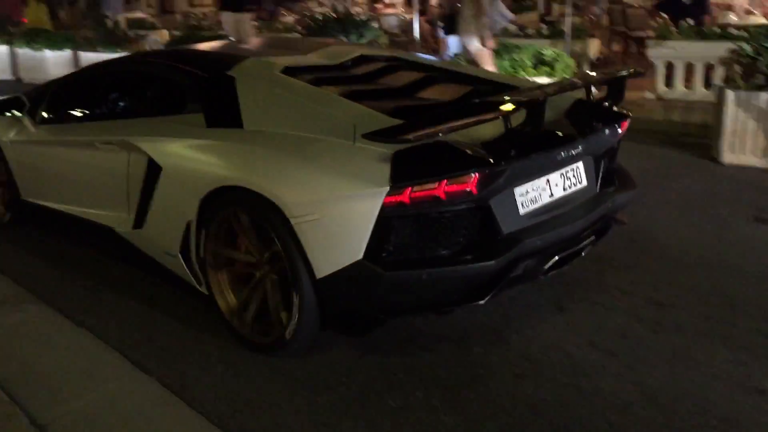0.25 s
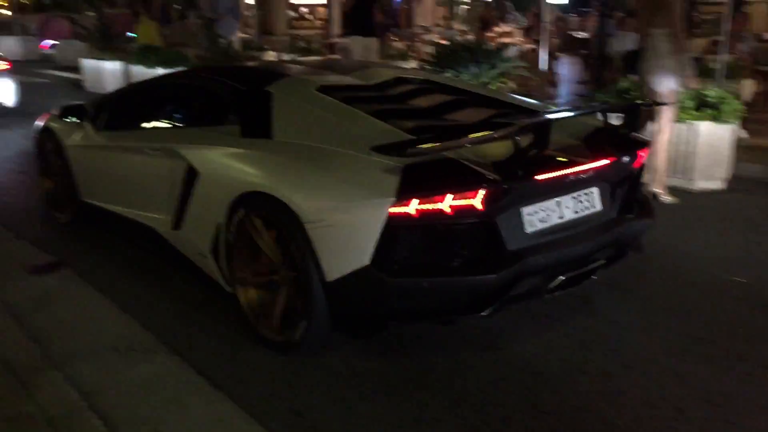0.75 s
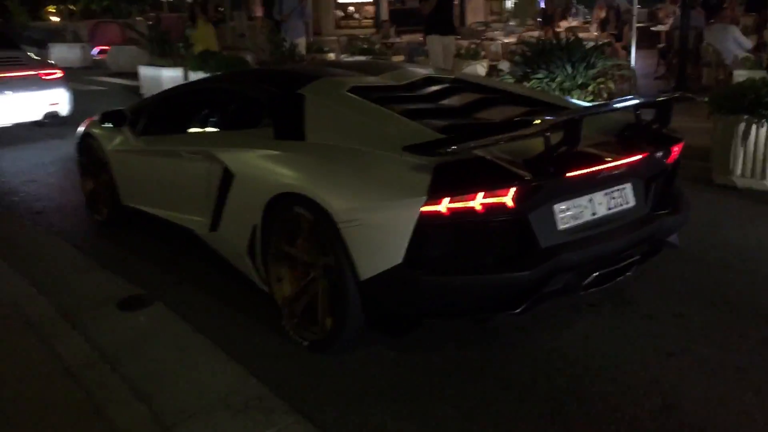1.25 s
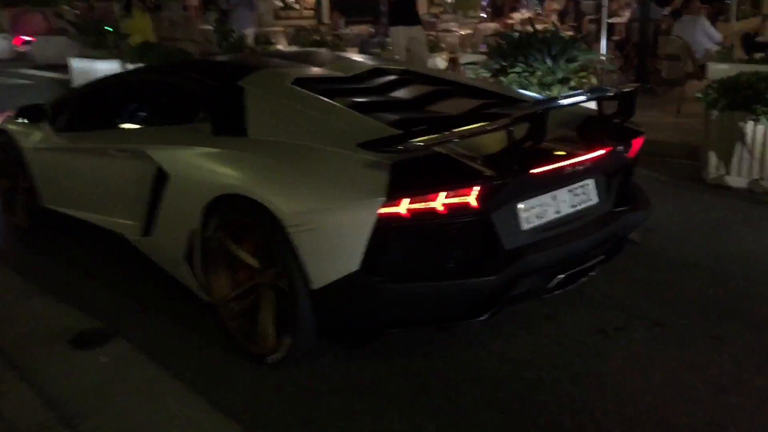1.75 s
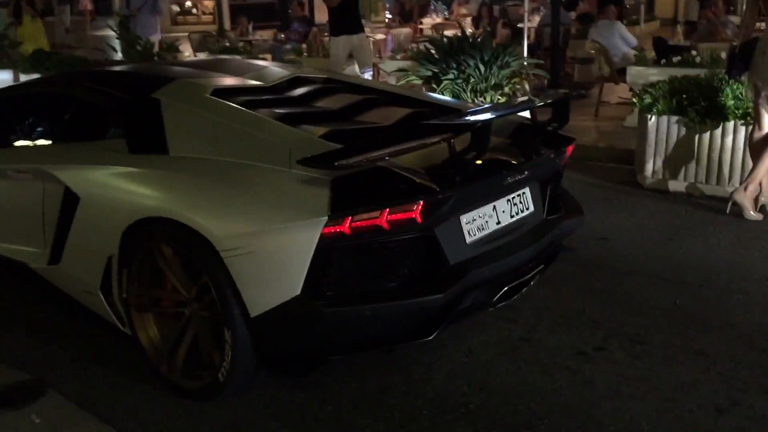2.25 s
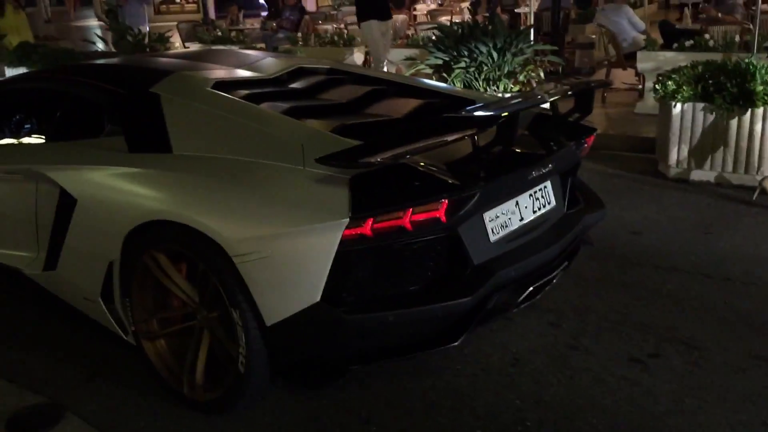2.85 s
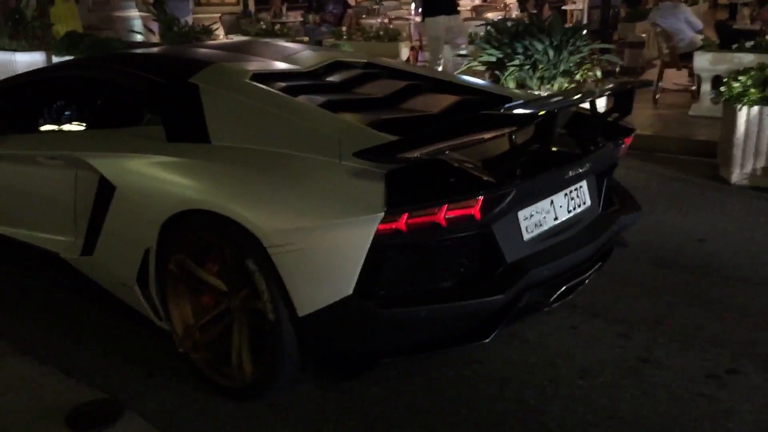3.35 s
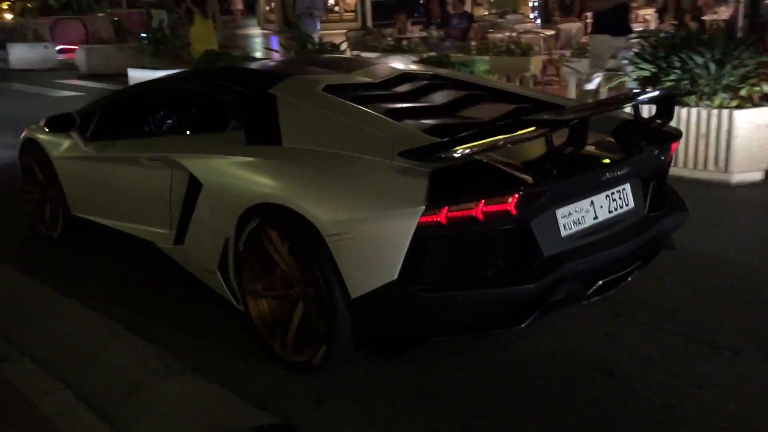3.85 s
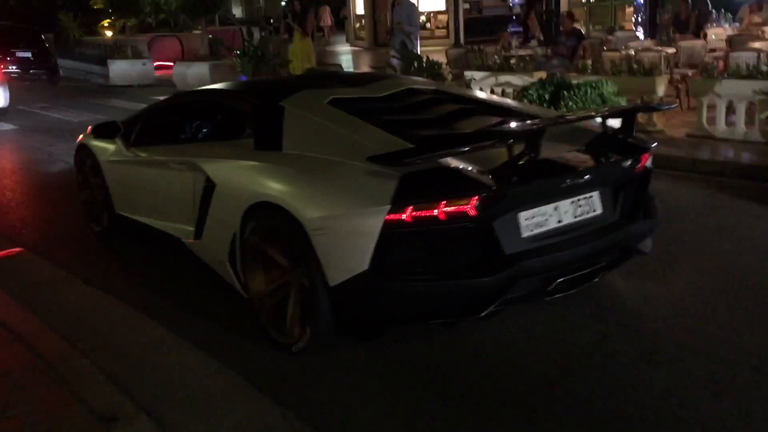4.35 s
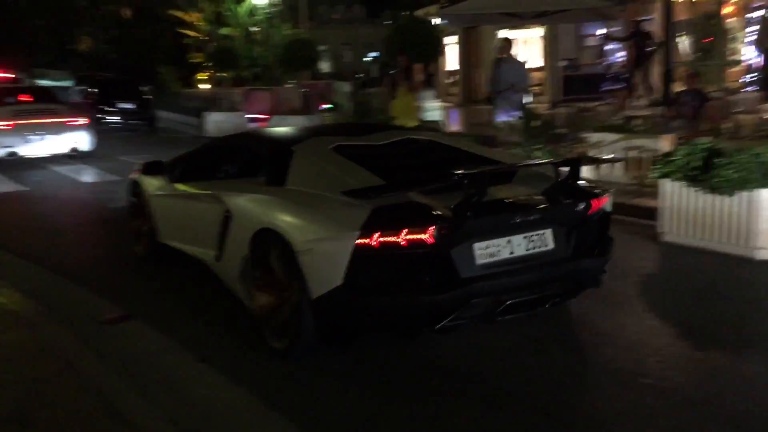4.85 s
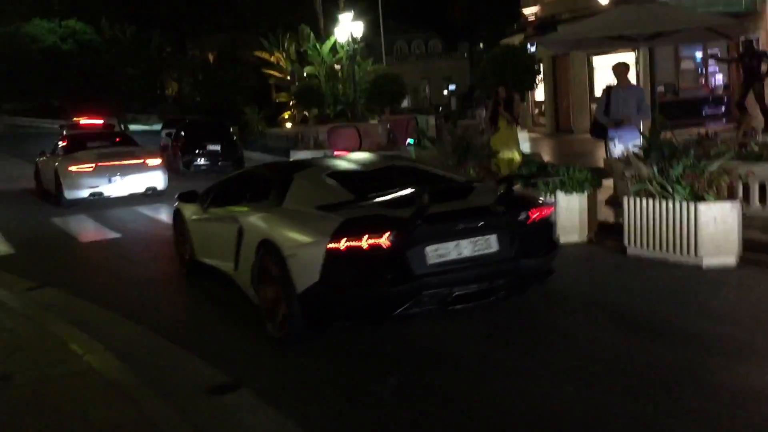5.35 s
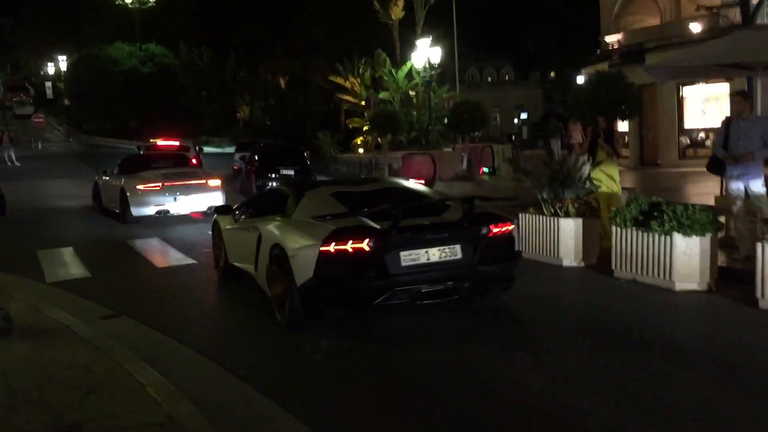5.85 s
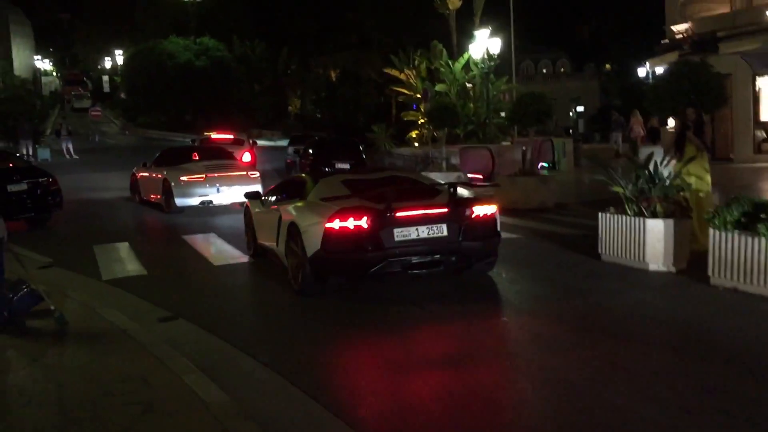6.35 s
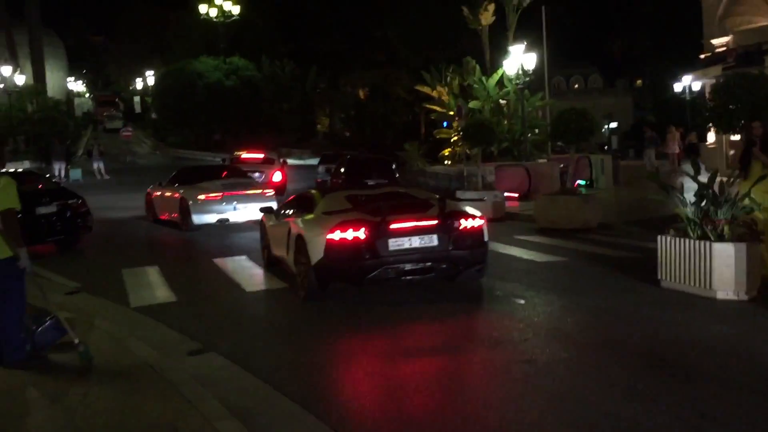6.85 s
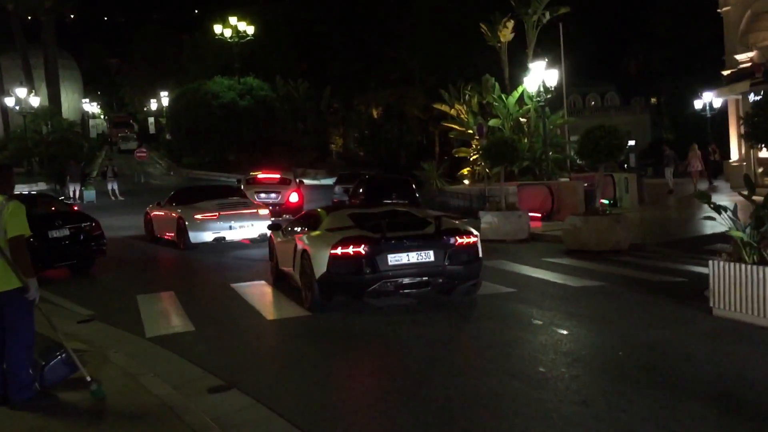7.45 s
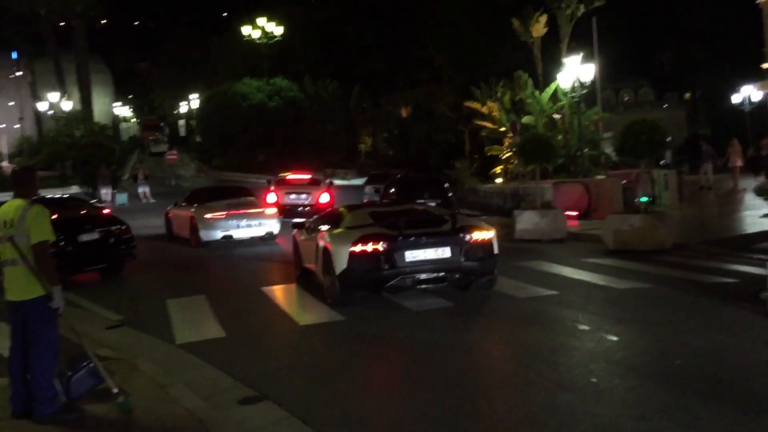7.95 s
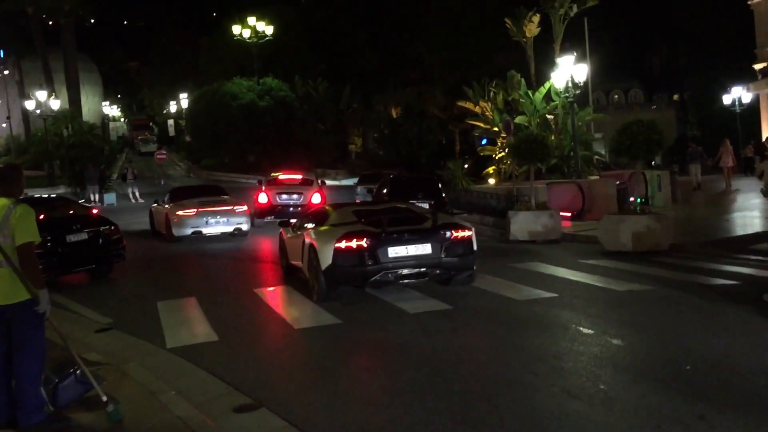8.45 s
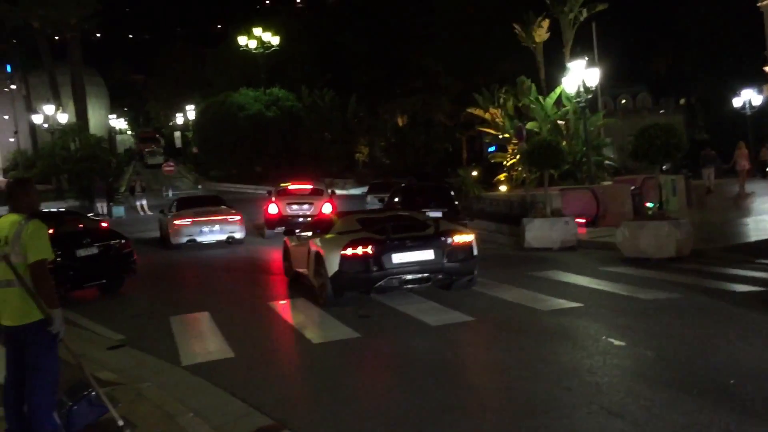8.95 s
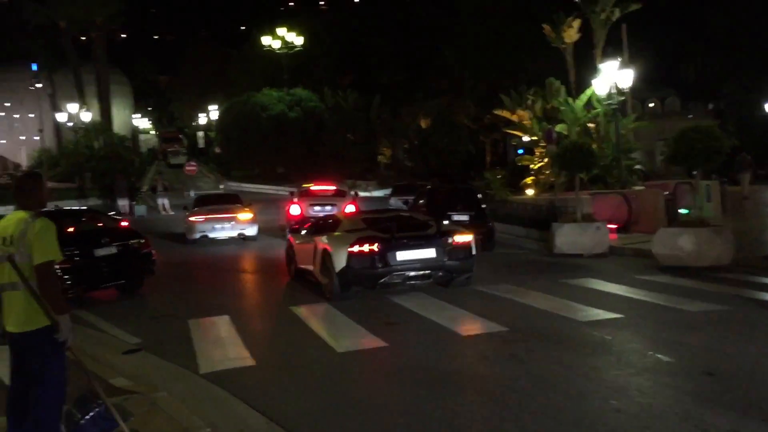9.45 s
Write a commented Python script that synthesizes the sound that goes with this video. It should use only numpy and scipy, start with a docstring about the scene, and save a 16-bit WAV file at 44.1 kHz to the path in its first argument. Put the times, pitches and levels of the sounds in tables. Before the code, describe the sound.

An open street at night, heard through a small handheld microphone behind a powerful twelve-cylinder sports car. From 0 s the engine drops quickly from a higher note to a lumpy idle, low and buzzing, with pulsed exhaust rasp and airy hiss. Thin, faint brake squeaks come around 0.6, 1.2, 1.7 and 2.1 s. At about 3 s a throttle blip snaps the pitch up with a raspy burst, leading into a strong, smoother booming drone that wavers until roughly 5.2 s. The car eases off; the pitch sags and soft, dull pops burble between 5.9 and 6.8 s. From 7 s it idles again, with light metallic ticking and another car's low hum, swelling near 6.5 and 8.3 s. At 8.6 s a second blip climbs higher, its hiss fading while the drone holds to the end at 9.7 s. Faint distant traffic lies beneath throughout.

```python
"""Twelve-cylinder engine creeping along a street

The engine idles, is blipped twice, holds a higher drone between the blips and burbles on the overrun.
Sine orders of the firing rate boom in the pipes, and noise gated by each firing rasps and hisses.
Unequal charges thump, misfires ring the pipe modes, and valve gear ticks once in four firings.
Brakes squeak as narrow-band noise, another car hums in sines, and far traffic is shaped noise."""
import sys
import numpy as np
from scipy import signal
from scipy.fft import rfft, irfft
from scipy.io import wavfile
from scipy.ndimage import uniform_filter1d

SR = 44100
rng = np.random.default_rng(int(sys.argv[2]) if len(sys.argv) > 2 else 0)


def bounce(signal):
    """Save signal as a 16-bit WAV file at the path given by the first command-line argument."""
    frames = np.transpose(np.atleast_2d(signal))
    limited = np.clip(frames, -1, 1)
    pcm = np.round(limited * 32767).astype(np.int16)
    wavfile.write(sys.argv[1], SR, pcm)


def undo_db(level):
    """Turn decibels back into plain size, where 20 dB means ten times bigger."""
    steps = np.asarray(level, float) / 20
    return 10 ** steps


N = 428211


def rms_one(x):
    """Normalization: a signal divided by its root mean square has unit power."""
    return x / np.sqrt(np.mean(x ** 2) + 1e-20)


def in_time(rows):
    """Linear interpolation turns the columns of a timed table into sample-rate curves."""
    s, *columns = np.transpose(rows)
    return [np.interp(np.arange(N) / SR, s, column) for column in columns]


def at_hz(points, hz):
    """Log-frequency interpolation: a spectrum table is read along a musical scale."""
    table_hz, table_db = np.array(points)[:, 0], np.array(points)[:, 1]
    return np.interp(np.log(hz), np.log(table_hz), table_db)


def drift(rate_hz):
    """Low-pass noise: a double pole leaves slow random motion of unit rms."""
    hop = 40  # samples per slow step
    r = np.exp(-2 * np.pi * rate_hz * hop / SR)
    white = rng.standard_normal(N // hop + 2002)
    slow = signal.lfilter([1], [1, -2 * r, r * r], white)[2000:]  # skip the onset of the filter
    return np.interp(np.arange(N) / hop, np.arange(len(slow)), rms_one(slow))


def coloured(x, spectrum):
    """Spectral shaping: each frequency is weighted by a table, then the rms is set to 1."""
    hz = np.arange(N // 2 + 1) * SR / N + 1  # plus 1 avoids log 0
    return rms_one(irfft(rfft(x) * undo_db(at_hz(spectrum, hz)), N))


def resonance(x, hz, width_hz, state=None):
    """Damped oscillator: a conjugate pole pair passes a band with gain 1 at its top."""
    r = np.exp(-np.pi * width_hz / SR)
    b = (1 - r * r) / 2 * np.array([1, 0, -1])
    a = [1, -2 * r * np.cos(2 * np.pi * hz / SR), r * r]
    return signal.lfilter(b, a, x, zi=state)


def gliding(x, hz, width_hz, size=256):
    """Time-varying resonance: the centre moves block by block while the stored state carries on."""
    out, state = np.zeros(N), np.zeros(2)
    for i in range(0, N, size):
        out[i:i + size], state = resonance(x[i:i + size], hz[i], width_hz, state)
    return out


def per_firing(turns, values):
    """Sample and hold: one value lasts for each firing."""
    return values[turns.astype(int)]


# Engine speed before inertia: time_s, firing_rate_hz
ENGINE_SPEED = [(0, 113), (.17, 83.3), (.24, 73.6), (.3, 73.2), (.48, 89.6), (.82, 82.5), (1, 86.8),
                (1.23, 87.2), (1.52, 89.8), (1.7, 90.2), (1.84, 92.6), (2, 89), (2.32, 89.7), (2.75, 87.6),
                (2.92, 90), (3.02, 98.5), (3.17, 141.5), (3.38, 157.8), (3.62, 163.8), (3.72, 162.5),
                (3.98, 147.6), (4.05, 147.6), (4.2, 156.3), (4.45, 153.3), (4.68, 159.4), (5.02, 165.6),
                (5.2, 162.8), (5.38, 146), (5.72, 147.3), (5.9, 135), (6.09, 142.8), (6.28, 126.8),
                (6.48, 127.5), (6.66, 107), (6.8, 103.3), (7.02, 80.8), (7.11, 80.5), (7.27, 90.6),
                (7.51, 89.4), (7.71, 92), (8, 90.7), (8.35, 91), (8.58, 101), (8.78, 143.5), (8.9, 159.3),
                (9.08, 168.8), (9.3, 184.5), (9.4, 182.5), (9.51, 175), (9.71, 172.1)]


def crank():
    """Rotational inertia rounds every change of speed; the integral of the rate counts the firings."""
    inertia_s = 0.05
    rate = uniform_filter1d(in_time(ENGINE_SPEED)[0], size=int(inertia_s * SR), mode="nearest")
    turns = np.cumsum(rate) / SR
    return turns, rate


# How hard the engine pulls, over the part-throttle level of the firing tone: time_s, level_db
ENGINE_LOAD = [(0, -2.5), (.15, -2), (.56, 0.5), (.89, -0.5), (1.8, 1.5), (2.8, 1), (3.07, 1), (3.2, 6.5),
               (3.4, 4), (3.45, 1), (3.85, 1), (4.02, -4.5), (4.21, 1.5), (4.46, 0.3), (5, 0.6),
               (5.22, -1.5), (5.44, -13), (5.67, -5), (5.92, -8), (6.08, -4.5), (6.25, -8.5), (6.55, -2.3),
               (6.7, -3.5), (6.94, 1), (7.12, -3), (7.5, 1), (8.45, -1.5), (8.7, -0.3), (8.88, 6.5), (9, 3),
               (9.2, 0.7), (9.39, -4), (9.6, -1.2), (9.71, -9.5)]
# The pipes favour each line at some speeds:
# firing_rate_hz, firing_tone_db, octave_db, seven_quarters_db, uneven_cylinders_db
LINE_LEVELS_BY_SPEED = [(71.4, -25, -16, -28, -32), (85, -25.5, -14.5, -32, -27.5),
                        (92.9, -22.5, -16, -28, -27.5), (105.4, -17.5, -23.5, -23.5, -32),
                        (121.2, -14.5, -34, -32, -27.5), (137.3, -14.5, -24, -33.5, -28.5),
                        (149, -13, -37, -34, -32.5), (161, -12, -40.5, -27.5, -32),
                        (185, -9.5, -42, -45, -41)]
# Separate swelling and fading of two tones: time_s, octave_db, seven_quarters_db
TONE_SWELL = [(0, -1, -2), (.12, 1.5, -4), (1.1, 0, 5.5), (3, -0.5, -3.5), (3.17, 6, -4), (3.32, -1, 0),
              (3.8, -4, 2), (4.02, 0.5, -4), (4.2, -5, 2.5), (4.7, -2.5, -4), (5, 5.5, -12.5),
              (5.3, 1.5, 0.5), (5.55, 1, -11), (5.92, 1.5, 3), (6.5, 0.5, 0.5), (6.85, -2, 7),
              (6.89, 4, -3.5), (7.8, 1, -7), (8.6, 1.5, -14), (8.8, 7, -8.5), (8.9, 8.5, -1),
              (9.12, 12.5, 2), (9.27, 0.5, -8), (9.71, 0.5, 1.5)]
# Unequal breathing of the cylinders, over the level set by the speed: time_s, level_db
UNEQUAL_BREATHING = [(0, -1.5), (.9, 0), (1.84, 2.5), (2.1, -0.5), (3.05, 0.5), (3.28, 8), (3.48, 0.5),
                     (4.5, -1.5), (4.95, 2), (5.24, -2.5), (5.45, -3), (5.65, 1), (6.2, 0), (6.6, -7),
                     (6.9, 0.5), (7.9, -4.5), (8.5, -1), (8.8, 2.5), (9, 1.5), (9.47, -3), (9.71, -1.5)]


def line_levels(rate):
    """Superposed gains in decibels: each line adds terms for speed, load or its own swell."""
    octave_follows, quarters_follow = 0.7, 1.47  # dB gained for each dB of load
    load_db, = in_time(ENGINE_LOAD)
    speeds, *laws = np.transpose(LINE_LEVELS_BY_SPEED)
    firing_db, octave_db, quarters_db, uneven_db = (np.interp(rate, speeds, law) for law in laws)
    octave_swell_db, quarters_swell_db = in_time(TONE_SWELL)
    firing_db = firing_db + load_db
    octave_db = octave_db + octave_follows * load_db + octave_swell_db
    quarters_db = quarters_db + quarters_follow * load_db + quarters_swell_db
    uneven_db = uneven_db + in_time(UNEQUAL_BREATHING)[0]
    return (firing_db, octave_db, quarters_db), uneven_db


# Orders of cylinders that breathe unequally over four firings: multiple_of_firing_rate, relative_level_db
UNEVEN_ORDERS = [(.25, -20.5), (.5, -3), (.75, 3), (1.25, 0.5), (1.5, 1.5), (2.25, 0), (2.5, -6),
                 (2.75, -6), (3, 3.5), (3.25, -9.5), (3.5, -19), (3.75, -9), (4, -7), (6, -1.5)]
# Boom of the pipes, which also colours the burble: frequency_hz, relative_level_db
PIPE_BOOM = [(15, -43.5), (32, -20.5), (45, -12), (90, -6.5), (130, -3), (180, 3), (230, -9), (278, -3.5),
             (320, -15.5), (360, -11), (410, -21.5), (480, -25.5), (570, -10.5), (640, -12.5), (720, -22),
             (1200, -48)]


def orders(turns, rate):
    """Fourier series of a periodic engine: three strong tones and weaker orders that the pipes colour."""
    tones_db, uneven_db = line_levels(rate)
    waver_db, loose_db, slip_rad = 1.03, 2.0, 0.2  # rms of the random motion
    out = np.zeros(N)
    for quarters, db in zip((4, 8, 7), tones_db):  # quarters of the firing rate
        gain = np.sqrt(2) * undo_db(db + waver_db * drift(6.2))
        out += gain * np.sin(np.pi / 2 * quarters * turns + quarters)
    for order, db in UNEVEN_ORDERS:
        boom_db = at_hz(PIPE_BOOM, order * rate)
        gain = undo_db(db + uneven_db + boom_db + loose_db * drift(3.3))
        phase = 2 * np.pi * rng.random() + slip_rad * drift(3.9)
        out += gain * np.sin(2 * np.pi * order * turns + phase)
    return out


# How unevenly the charges burn; the burble sounds 7 dB above this: time_s, relative_level_db
UNEVEN_BURNING = [(0, -30.5), (.24, -36), (.4, -42), (1.5, -35), (1.84, -36.5), (2.9, -39), (3.15, -25),
                  (3.32, -42.5), (5.65, -43.5), (6, -38), (6.22, -29), (6.35, -33), (6.47, -33.5),
                  (6.6, -35), (6.75, -27.5), (6.9, -36), (7.1, -42), (8, -35), (8.5, -41.5), (8.75, -27),
                  (9, -32), (9.5, -48), (9.71, -45)]


def burble(turns, rate):
    """Random impulse train: chance differences between firings thump dully into the pipes."""
    fired = np.diff(np.floor(turns), prepend=0) > 0
    # dividing by the root of the rate keeps the mean power of the train steady
    sizes = per_firing(turns, rng.standard_normal(3000)) / np.sqrt(rate)
    dull = signal.butter(3, 360, fs=SR, output="sos")
    thumps = signal.sosfilt(dull, coloured(fired * sizes, PIPE_BOOM))
    return undo_db(in_time(UNEVEN_BURNING)[0] + 7) * thumps


def puffs(turns, sharp, spread_db, steady):
    """Amplitude modulation: noise jumps at each firing and decays until the next, over a steady flow."""
    chance = np.clip(rng.standard_normal(3000), -2, 1.6)
    pattern_db = 2.0 * np.cos(np.pi / 2 * np.floor(turns))  # every fourth firing is strongest
    strength = undo_db(spread_db * per_firing(turns, chance) + pattern_db)
    gate = steady + strength * np.exp(-sharp * (turns % 1))
    return rms_one(uniform_filter1d(gate, size=40)) * rng.standard_normal(N)


# Gas flow, which sets the level of rasp and hiss: time_s, relative_level_db
GAS_FLOW = [(0, -49.5), (.1, -49.5), (.26, -52.5), (.4, -52), (.55, -48.5), (1.85, -45.5), (2.27, -47.5),
            (2.98, -48), (3.22, -39.5), (3.35, -48), (3.5, -53), (4.5, -54.5), (4.92, -50.5), (5.24, -60.5),
            (5.62, -53.5), (6.06, -48.5), (6.6, -47), (6.89, -43.5), (7.1, -47), (7.8, -50), (8.1, -51),
            (8.54, -45.5), (8.71, -41), (8.84, -38.5), (8.98, -47.5), (9.47, -57), (9.71, -63)]
# Resonances of the low rasp: frequency_hz, width_hz, relative_level_db
LOW_RASP_MODES = [(740, 78, 7), (1056, 182, 13), (1312, 78, 2.5)]
# Colour of the rasp over the gas flow as the car turns and rolls away: time_s, silencer_hoot_db,
# low_rasp_db, middle_rasp_db, tailpipe_ring_db, upper_ring_db, upper_ring_hz
RASP_COLOUR_IN_TIME = [(0, 6, 7, 0, 1, 7, 2490), (.15, 11.5, 11, 2, 1, 7, 2500),
                       (.38, 4, 5.5, 4.5, -1, -4.5, 2590), (.5, 1.5, 7, 8, -5, 4, 2605),
                       (2, -1.5, 7.5, 1, -0.5, -1, 2610), (3, 2.5, 9.5, 2.5, 4, -2.5, 2680),
                       (3.12, 3, 9, 2, 5.5, -1, 2720), (3.22, 8.5, 8, 0.5, 16.5, -0.5, 2620),
                       (3.3, 14, 13, 3, 0, 8, 2470), (3.35, 4.5, 11, -2.5, 1, 7.5, 2390),
                       (4.4, 4, 10, 6.5, -17, 9.5, 2640), (4.97, 3.5, 2, 6, -2, 6, 2700),
                       (5.15, 7, 0, 8.5, 3.5, 0, 2700), (5.6, 7.5, 0, 3.5, 8, -14, 2650),
                       (6.4, 10, 3, 2, 3.5, -4.5, 2670), (7, 3.5, 4, -2.5, 4.5, -4, 2620),
                       (7.3, 6.5, 8, 0, 1.5, 5.5, 2900), (8.4, 5.5, 7.5, -3.5, 2, 7, 2920),
                       (8.8, 8, 8, -6, 0, 3, 3240), (9.1, 11.5, 7, -1.5, 3, 7.5, 3220),
                       (9.71, 15, 3.5, -10, -2.5, 2.5, 3210)]


def rasp(turns):
    """Forced resonance: gas puffs ring fixed pipe modes, sharper cracks the tailpipe and a gliding pair."""
    hoot_db, low_db, middle_db, tail_db, ring_db, ring_hz = in_time(RASP_COLOUR_IN_TIME)
    gas = puffs(turns, sharp=1.6, spread_db=4.5, steady=0.8)
    hoot = resonance(resonance(gas, 569, 62), 575, 200)
    low = np.zeros(N)
    for hz, width_hz, db in LOW_RASP_MODES:
        mode = rms_one(resonance(resonance(gas, hz, width_hz), hz, 3 * width_hz))
        low += undo_db(db + 1.2 * drift(5)) * mode
    middle = resonance(resonance(gas, 1582, 200), 1790, 430)

    crack = puffs(turns, sharp=4.5, spread_db=5.0, steady=0.25)
    tail = resonance(resonance(crack, 2420, 180), 2116, 380)
    ring_width_hz = 480
    ring = rms_one(gliding(gliding(crack, ring_hz, ring_width_hz), ring_hz, ring_width_hz * 2))
    ring += undo_db(-13.5) * rms_one(gliding(crack, 1.4 * ring_hz, ring_width_hz))

    layers = (hoot_db, hoot), (low_db, low), (middle_db, middle), (tail_db, tail), (ring_db, ring)
    mixed = sum(undo_db(db) * rms_one(layer) for db, layer in layers)
    return undo_db(in_time(GAS_FLOW)[0]) * mixed


# Spectrum of the jet noise: frequency_hz, relative_density_db_per_hz
JET_SPECTRUM = [(1060, -29), (1800, -16), (1920, -11.5), (2370, -2.5), (4850, -9.5), (6510, -14),
                (7650, -16.5), (8590, -13.5), (10600, -20), (14700, -27), (15200, -26)]


def hiss(turns):
    """Turbulent jet noise, partly pulsed by the firings; eddies of three sizes flicker independently."""
    spectrum = [(900, -47.5)] + list(JET_SPECTRUM)
    out = np.zeros(N)
    for edge_hz, kind in (5200, "low"), ([5200, 9000], "band"), (9000, "high"):
        jet = coloured(puffs(turns, sharp=1.5, spread_db=5.5, steady=1.4), spectrum)
        band = signal.sosfilt(signal.butter(3, edge_hz, kind, fs=SR, output="sos"), jet)
        out += undo_db(1.1 * drift(31)) * band
    return undo_db(in_time(GAS_FLOW)[0] + 3.5) * out


# Valve-gear ticks, heard from behind: time_s, level_db
VALVE_TICKS = [(0, -66), (3, -66.5), (3.5, -78), (7, -64), (7.4, -57.5), (8.6, -50.5), (9, -58),
               (9.71, -70)]


def ticks(turns):
    """Impact excitation: once in four firings a short noise burst rings a metallic resonance."""
    lag = 0.52  # of the four-firing cycle
    struck = np.diff(np.floor(turns / 4 + lag), prepend=0) > 0
    strength = undo_db(2.3 * per_firing(turns, rng.standard_normal(3000)))
    burst = signal.lfilter([1], [1, -0.99], struck * strength) * rng.standard_normal(N)
    ringing = resonance(resonance(burst, 6300, 900), 6300, 1800)
    return undo_db(in_time(VALVE_TICKS)[0]) * rms_one(ringing)


# Another car in the queue: time_s, hum_hz, hum_db, low_note_hz, low_note_db
QUEUED_CAR = [(0, 175, -58, 52.1, -56), (1.5, 170, -60, 52, -55), (1.9, 176, -60, 55, -37),
              (2.2, 174, -57.5, 52, -57), (4.6, 178.7, -52, 60.35, -61), (5.4, 174.3, -37.5, 60, -64),
              (6.4, 178.3, -24, 60.9, -51), (6.8, 176.7, -24.5, 87.1, -45), (7.05, 178.2, -25.5, 85, -52),
              (7.3, 173.6, -52, 70.9, -35), (7.8, 174.4, -37, 60, -34), (8.3, 175, -22, 54.6, -38),
              (8.7, 174, -20, 56, -43), (8.9, 182, -41, 53.1, -51), (9.71, 174, -53, 54.4, -56)]


def other_car():
    """Harmonic synthesis: an idle hum with its half and octave, and a separate low note."""
    hum_hz, hum_db, low_hz, low_db = in_time(QUEUED_CAR)
    hum, low = (2 * np.pi * np.cumsum(hz * (1 + 0.0023 * drift(3.4))) / SR for hz in (hum_hz, low_hz))
    hum_wave = np.sin(hum) + undo_db(-11.5) * np.sin(hum / 2) + undo_db(-20.5) * np.sin(2 * hum)
    hum_tone = undo_db(hum_db + drift(6.4)) * hum_wave
    low_tone = undo_db(low_db + 1.7 * drift(4.5)) * np.sin(low)
    return np.sqrt(2) * (hum_tone + low_tone)


# Spectrum of the far traffic: frequency_hz, relative_density_db_per_hz
STREET_SPECTRUM = [(20, -36.5), (45, -2), (200, -0.5), (400, -14), (700, -8), (2000, -15), (6000, -24.5),
                   (15000, -37)]
# Level of the far traffic: level_db (rms)
STREET_LEVEL_DB = -45.5


def street():
    """Incoherent sum of many far sources: stationary noise shaped by one spectrum."""
    return undo_db(STREET_LEVEL_DB) * coloured(rng.standard_normal(N), STREET_SPECTRUM)


# Brake squeaks: start_s, end_s, pitch_hz, level_db (rms)
BRAKE_SQUEAKS = [(0.578, .86, 6330, -57), (1.18, 1.4, 6200, -59), (1.66, 1.86, 6260, -58),
                 (2.1, 2.25, 6427, -66)]


def squeaks():
    """Friction-driven resonance: pads grip the discs, heard as a thin wavering whistle."""
    t, out = np.arange(N) / SR, np.zeros(N)
    noise = rng.standard_normal(N)
    for start, end, hz, db in BRAKE_SQUEAKS:
        held = np.clip(np.minimum(t - start, end - t) / 0.023, 0, 1)  # 23 ms ramps
        out += undo_db(db) * held * rms_one(resonance(resonance(noise, hz, 110), hz, 110))
    return out


# Misfires on the overrun: start_s, relative_level_db
MISFIRES = [(5.903, -15), (6.027, -13.5), (6.098, -7.5), (6.168, -4.5), (6.294, -8), (6.439, -4),
            (6.518, -12), (6.589, -13.5), (6.72, -8), (6.79, -12)]
# Pipe modes that a misfire rings: frequency_hz, relative_level_db, t60_s
PIPE_MODES = [(65, -20, .1), (121, -5.5, 0.11), (177, 2, 0.23), (194.5, -0.5, 0.12), (268.3, -13, 0.36)]


def pops():
    """Modal ringing: each misfire is a short ragged push of gas that excites decaying pipe modes."""
    push_s = 0.0093  # delay to the peak of the push, and its width
    t, push, out = np.arange(N) / SR, np.full(N, 1e-18), np.zeros(N)
    noise = rng.standard_normal(N)
    for s, db in MISFIRES:
        push += undo_db(db - 34.0) * noise * np.exp(-((t - s - push_s) / push_s) ** 2)
    for hz, db, t60 in PIPE_MODES:
        r, w = undo_db(-60 / (t60 * SR)), 2 * np.pi * hz / SR
        out += undo_db(db) * signal.lfilter([0, np.sin(w)], [1, -2 * r * np.cos(w), r * r], push)
    return signal.sosfilt(signal.butter(3, [42, 300], "band", fs=SR, output="sos"), out)


def scene():
    """Linear superposition: the near engine's orders, burble, gas noise and ticks share one crank phase."""
    turns, rate = crank()
    engine = orders(turns, rate) + burble(turns, rate) + pops()
    air = rasp(turns) + hiss(turns) + ticks(turns) + squeaks()
    return (engine + air + other_car() + street())[None]


def band_limit(x):
    """A steep low-pass at the top of the band."""
    return signal.sosfilt(signal.butter(12, 15370, fs=SR, output="sos"), x)


def record(dry):
    """Soft saturation: a small microphone rounds the highest peaks."""
    mix = 1.387 * np.tanh(dry / 1.394)
    return band_limit(mix)


dry = scene()
out = record(dry)
bounce(out)
```